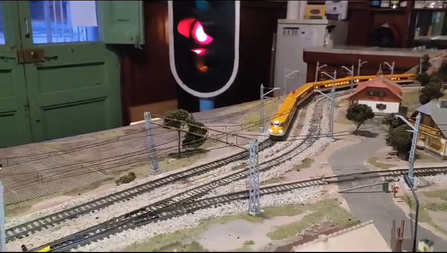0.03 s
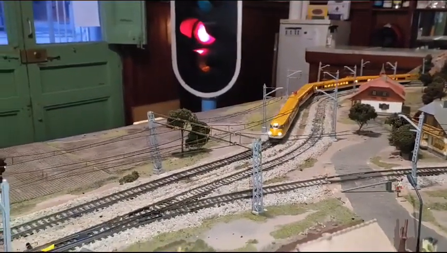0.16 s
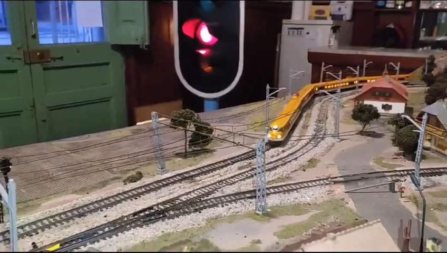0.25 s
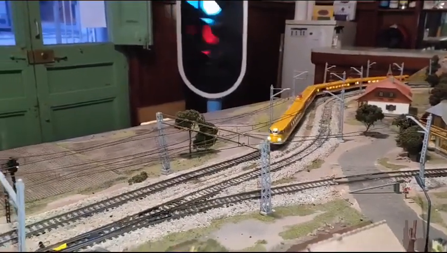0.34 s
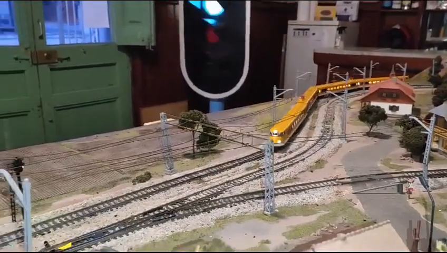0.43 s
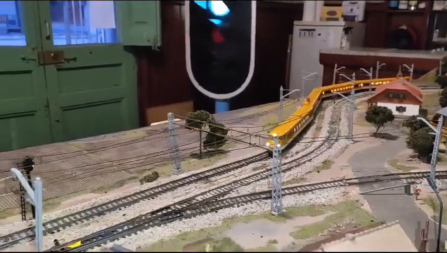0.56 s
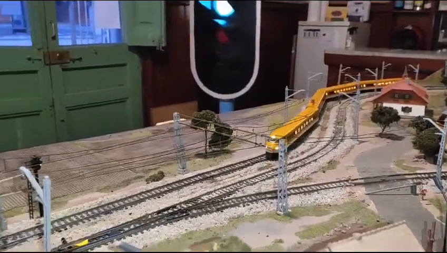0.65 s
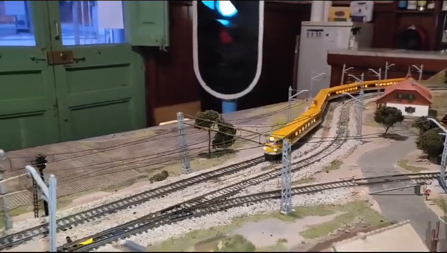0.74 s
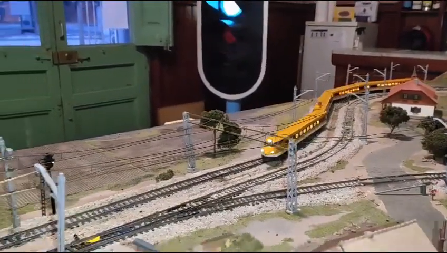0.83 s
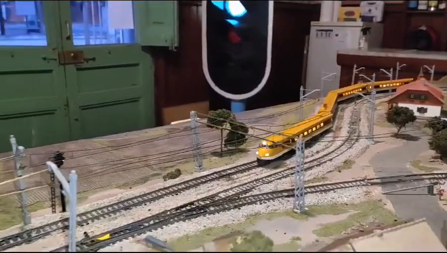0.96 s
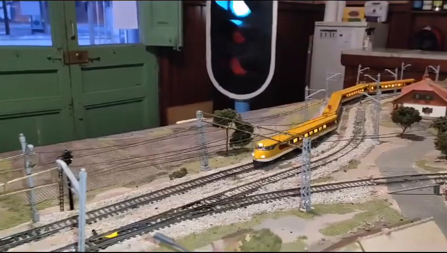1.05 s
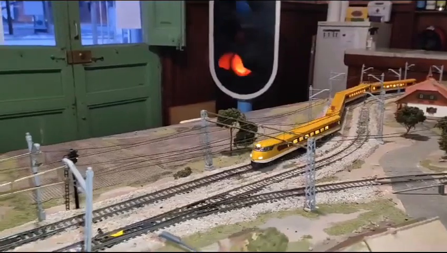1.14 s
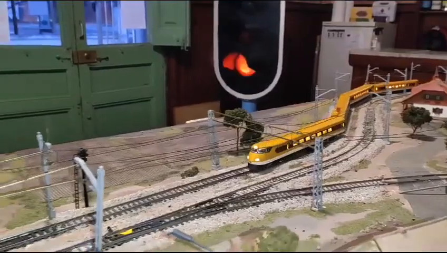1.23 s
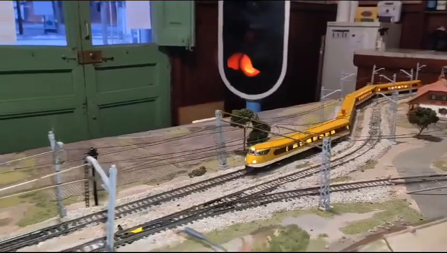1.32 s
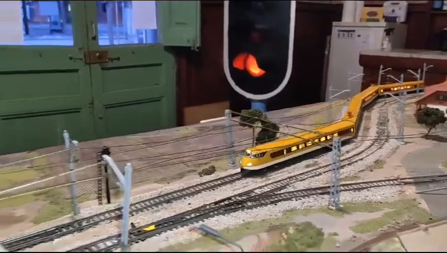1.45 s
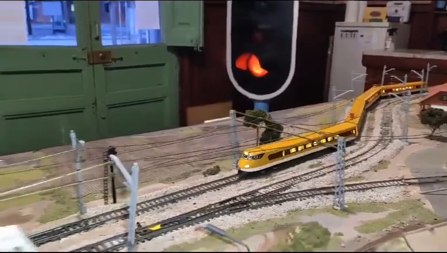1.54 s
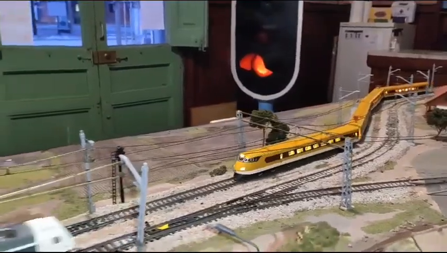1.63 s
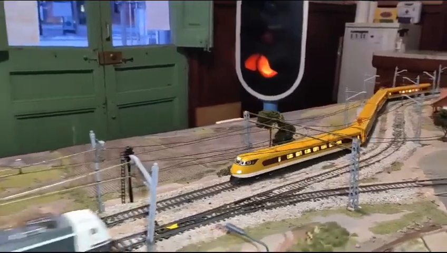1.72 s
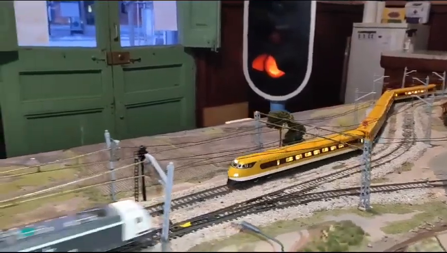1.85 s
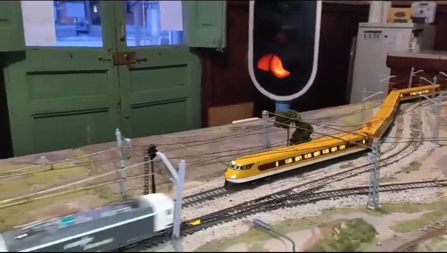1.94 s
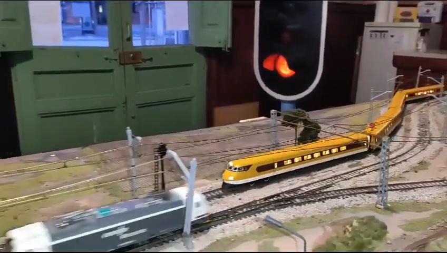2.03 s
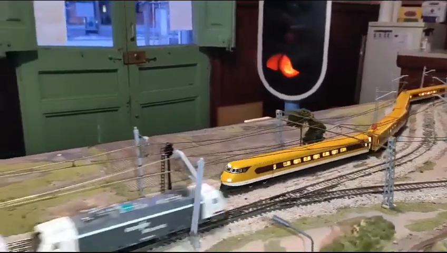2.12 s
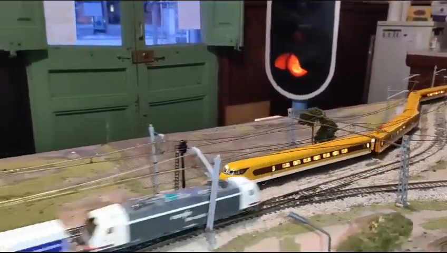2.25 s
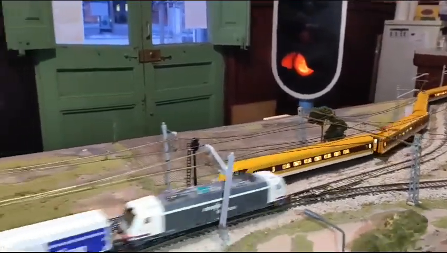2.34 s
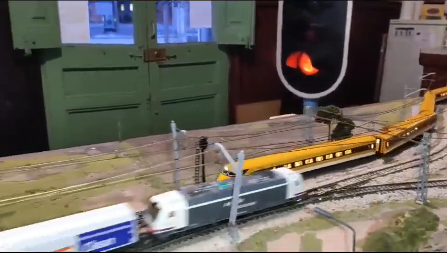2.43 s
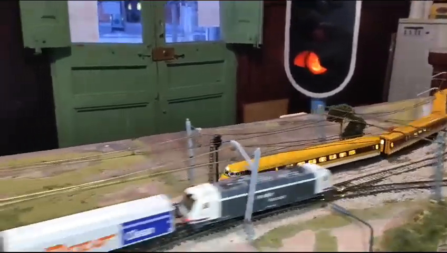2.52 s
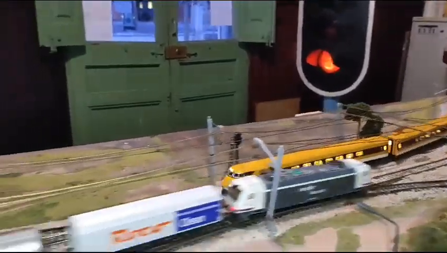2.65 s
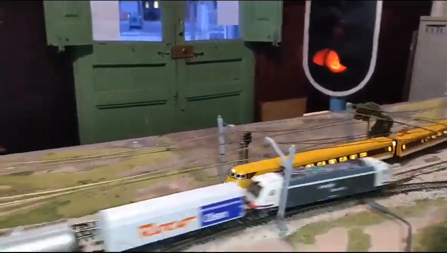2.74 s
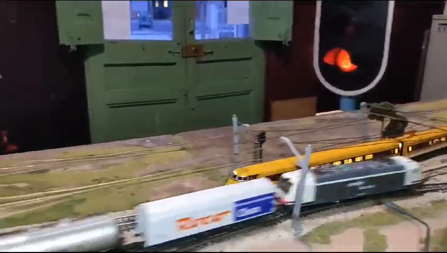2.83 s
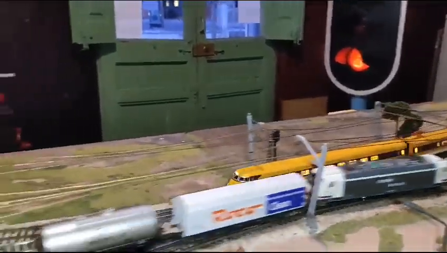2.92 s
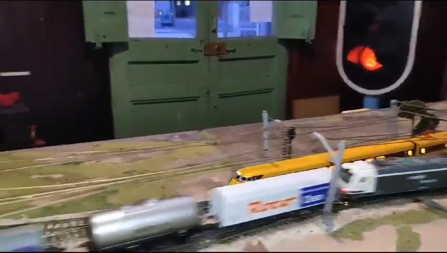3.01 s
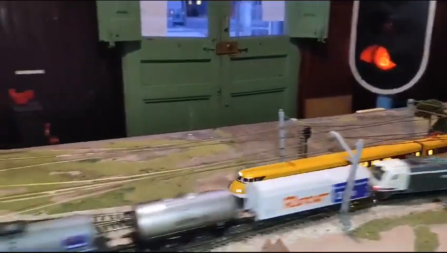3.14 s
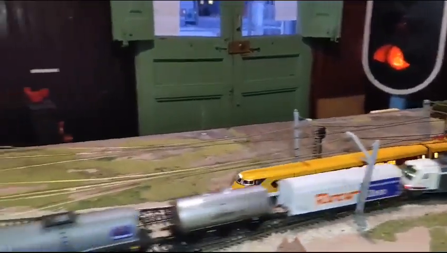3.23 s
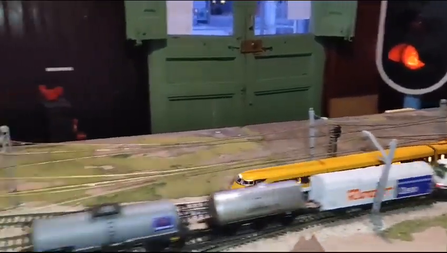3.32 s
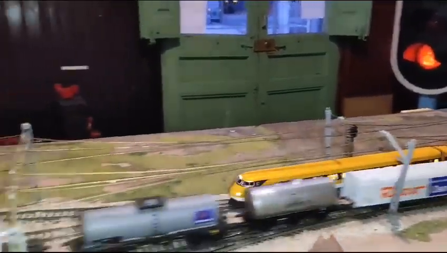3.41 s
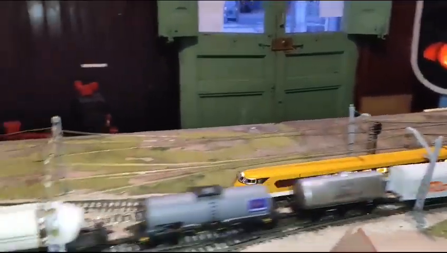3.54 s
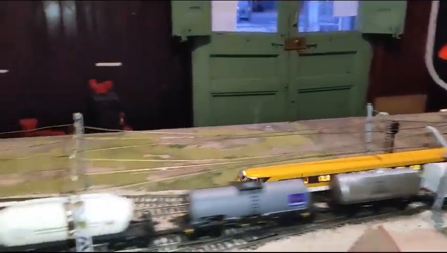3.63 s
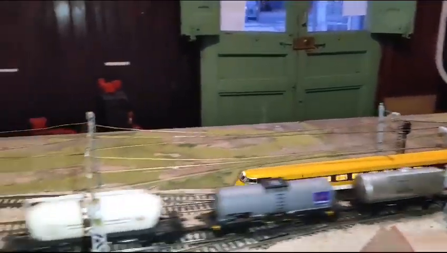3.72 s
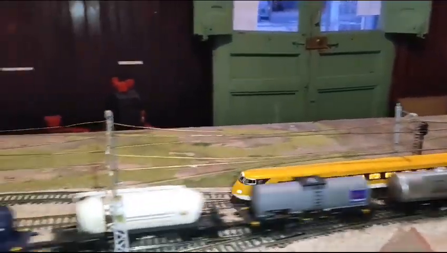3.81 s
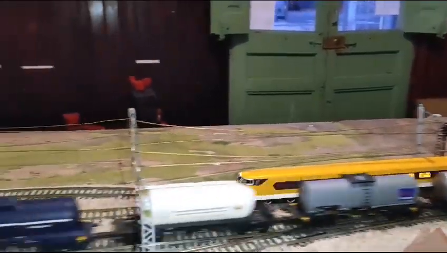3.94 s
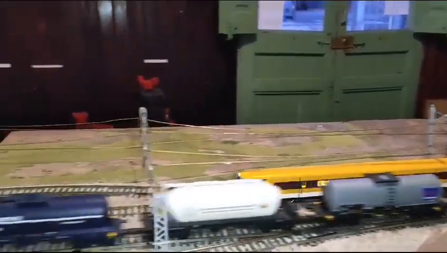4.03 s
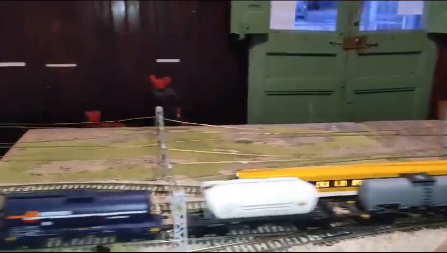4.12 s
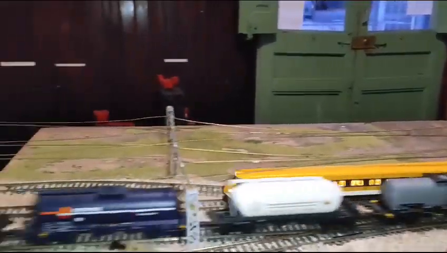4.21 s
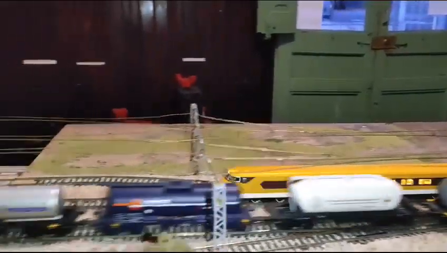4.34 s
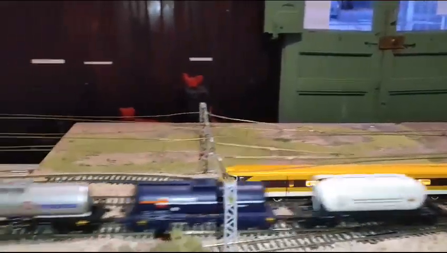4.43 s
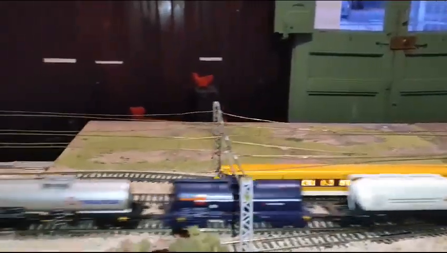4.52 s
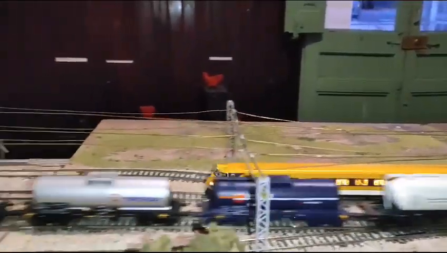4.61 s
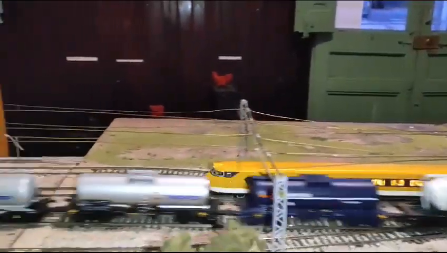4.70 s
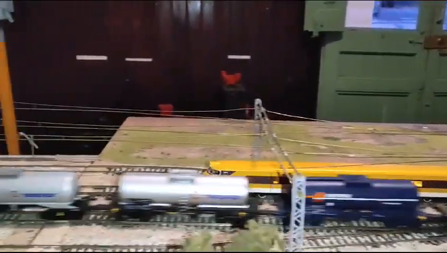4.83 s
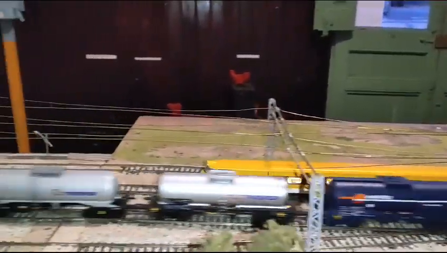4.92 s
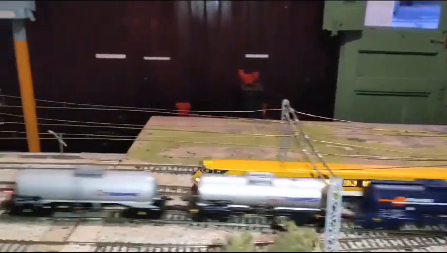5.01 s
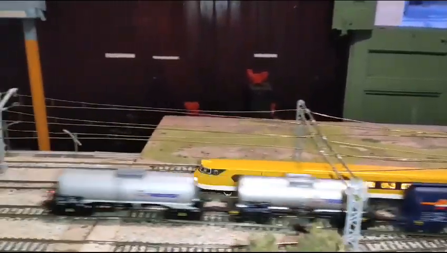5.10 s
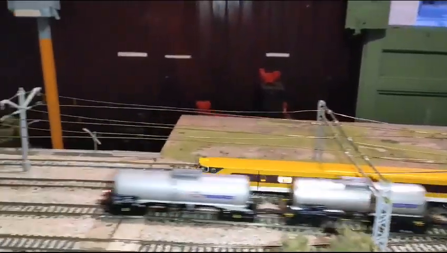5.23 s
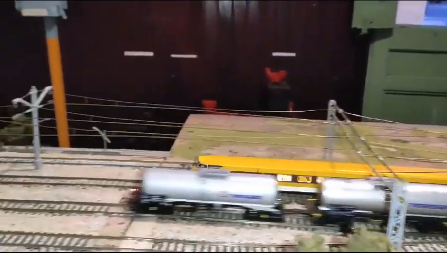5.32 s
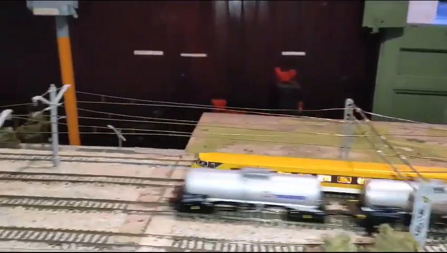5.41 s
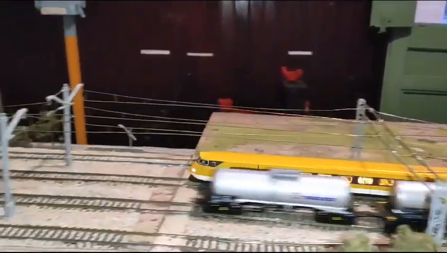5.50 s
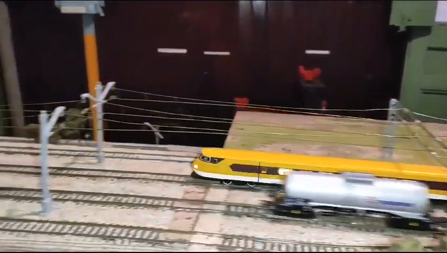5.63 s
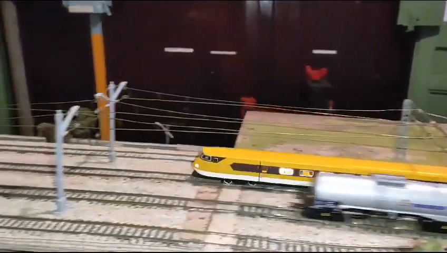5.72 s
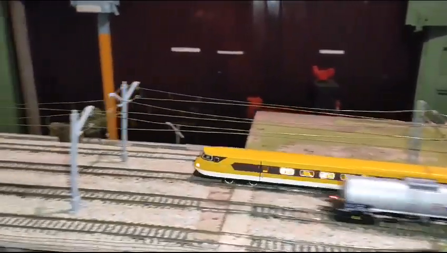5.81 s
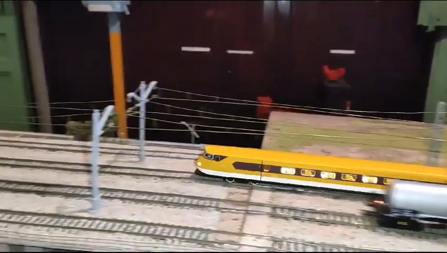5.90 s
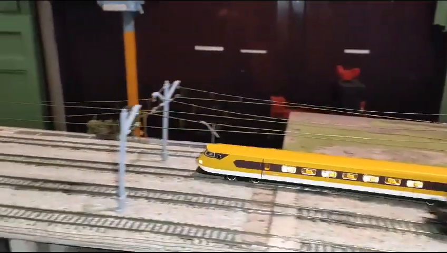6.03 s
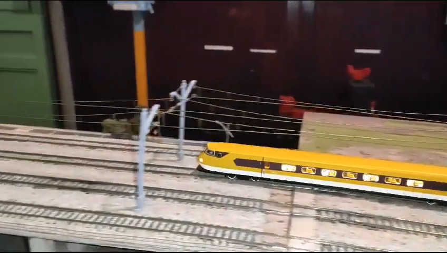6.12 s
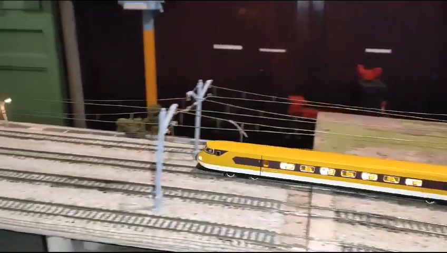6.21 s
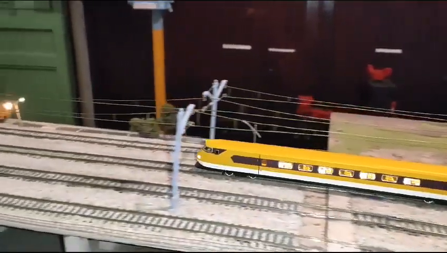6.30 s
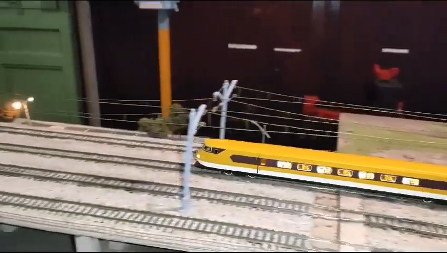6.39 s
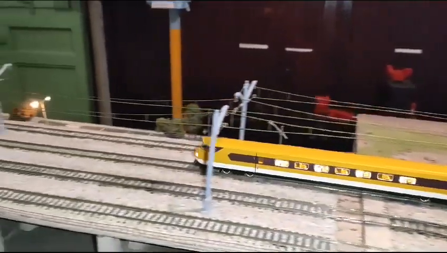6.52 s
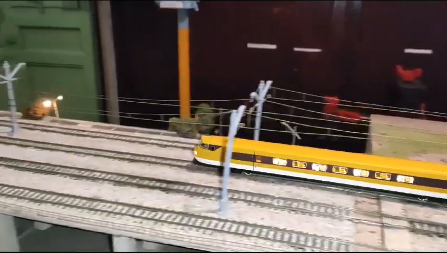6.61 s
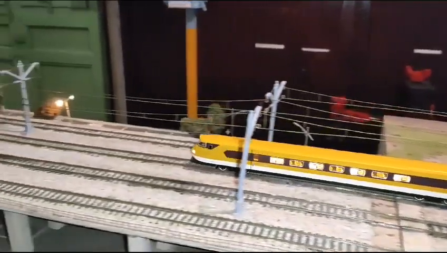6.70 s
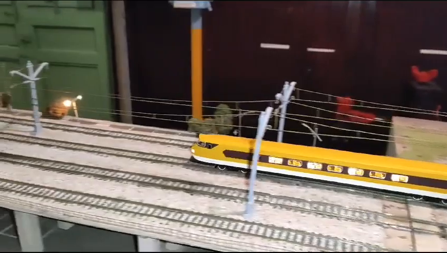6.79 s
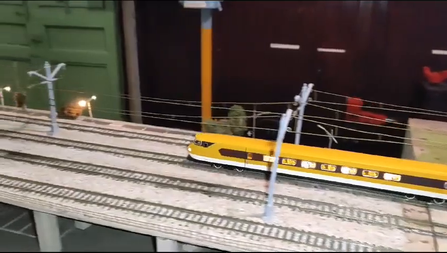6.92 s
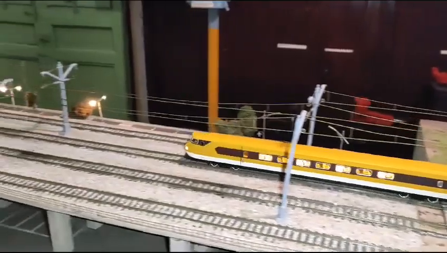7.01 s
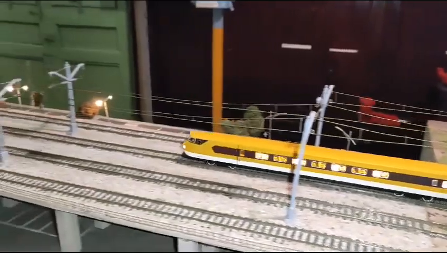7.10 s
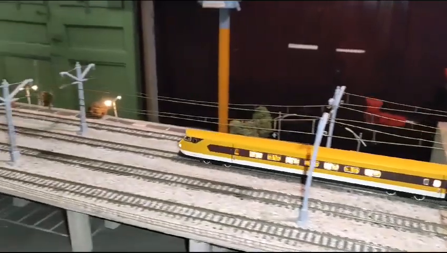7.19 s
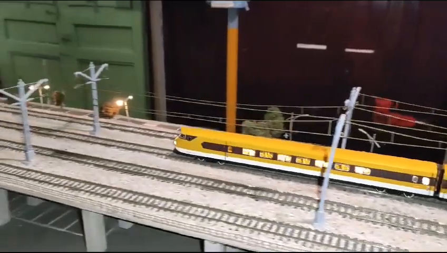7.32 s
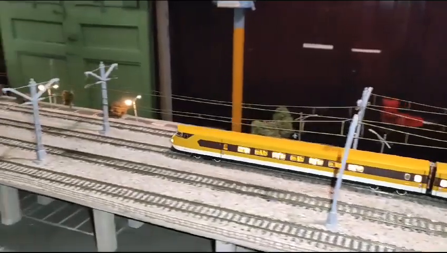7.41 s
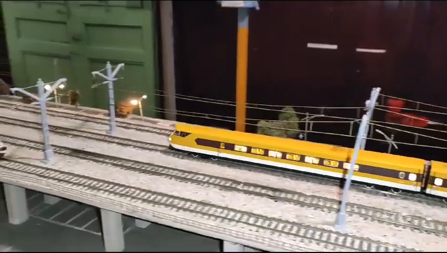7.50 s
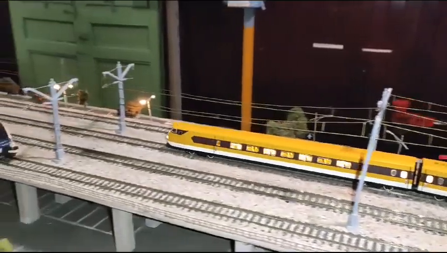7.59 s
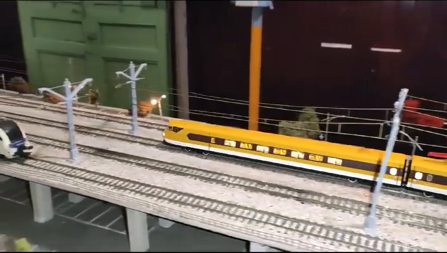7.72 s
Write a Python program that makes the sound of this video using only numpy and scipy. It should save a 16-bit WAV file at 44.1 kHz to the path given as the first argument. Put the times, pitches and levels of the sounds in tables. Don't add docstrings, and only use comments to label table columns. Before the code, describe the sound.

In an indoor hall, a model passenger train approaches with a dry rolling roar and scattered bright clicks over rail joints. A goods train then passes in front, its wheels clattering denser and louder, with faint motor hum and dull baseboard thumps. After it leaves, the roar drops and separate clicks remain. Close phone microphone, short room reflections.

```python
import sys
import numpy as np
from scipy import signal
from scipy.fft import rfft, irfft, next_fast_len
from scipy.io import wavfile
from scipy.ndimage import uniform_filter1d

SR = 44100
rng = np.random.default_rng(int(sys.argv[2]) if len(sys.argv) > 2 else 0)


def store_pcm(level_fs):
    pcm = np.round(np.clip(level_fs, -1, 1) * 32767).astype(np.int16)
    wavfile.write(sys.argv[1], SR, np.atleast_2d(pcm).T)


def gain_from_db(level_db):
    decades = np.asarray(level_db, float) / 20
    return 10 ** decades


N = 341775
USUAL_ROAR_DB = -42


def colour(points, hz):
    f, db = np.transpose(points)
    return gain_from_db(np.interp(np.log(np.maximum(hz, 1)), np.log(f), db))


def unit(x):
    return x / np.sqrt(np.mean(x ** 2))


def walk(rate_hz):
    hold = int(SR / rate_hz)
    levels = rng.standard_normal(size=400)[np.arange(N) // hold % 400]
    return unit(uniform_filter1d(uniform_filter1d(levels, hold), hold))


def mode(hz, centre_hz, width_hz):
    return 1 / (1 + 2j * (hz - centre_hz) / width_hz)


def sung(centre_hz, width_hz):
    size = next_fast_len(N)
    hz = np.arange(size // 2 + 1) * SR / size
    spectrum = rfft(rng.standard_normal(size)) * mode(hz, centre_hz, width_hz) ** 2
    return unit(irfft(spectrum, size)[:N])


def fade(start_s, end_s, fade_s):
    t = np.arange(N) / SR
    return np.clip(np.minimum(t - start_s, end_s - t) / fade_s + .5, 0, 1)


# [dB, scaled in each
PASSAGE = [(0, -45, -5, 5), (.45, -44, -5, 2), (.8, -43.3, -4, 5.5), (1.2, -42, -4, 1.5),
           (1.45, -42.5, -4, 4), (1.8, -41.5, -4.5, 0.5), (2.2, -40.5, -6, 1.5), (2.75, -40.5, -3, -1),
           (3.15, -39.5, -4.5, 0.5), (3.9, -40, -3.5, -1.5), (4.65, -40, -1.5, -1.3), (5.3, -40, -0.5, 3.5),
           (5.95, -40, -2.5, 5), (6.25, -47, -0.5, 2.5), (6.7, -47.5, -1, 1), (6.95, -45.5, -0.5, -1.5),
           (7.3, -47, -1.5, 1.5), (7.75, -45, -0.5, 1)]


def passage():
    start_s, *columns = np.transpose(PASSAGE)
    return [np.interp(np.arange(N) / SR, start_s, column) for column in columns]


# centre_s [s], added_rumble_db [dB]
HOLLOW_SURGES = [(.75, 0), (1.2, 3.5), (1.7, 3), (2.15, -1), (2.55, 1), (2.92, 3.5), (3.5, 3), (3.95, 1),
                 (4.45, 0.5), (5.05, 3.5), (5.4, 2), (5.95, 2), (6.6, 2), (7.2, -2.5), (7.65, 4.5)]


def baseboard_levels(roar_db, tilt_db):
    t, width_s = np.arange(N) / SR, 0.074
    louder_db = roar_db - USUAL_ROAR_DB
    rumble_db = -52 + 0.585 * louder_db + 0.12 * tilt_db
    middle_db = -52.5 + .4 * louder_db + 0.087 * tilt_db
    surge_db = sum(db * np.exp(-((t - at_s) / width_s) ** 2 / 2) for at_s, db in HOLLOW_SURGES)
    return rumble_db + surge_db, middle_db


def grit(rate_hz, spread_db, tail_ms):
    sizes = gain_from_db(spread_db * rng.exponential(size=N).clip(0, 3))
    hits = (rng.random(N) < rate_hz / SR) * sizes
    return signal.lfilter([1], [1, -np.exp(-1000 / (tail_ms * SR))], hits)


# pitch_hz [Hz], density_db [dB per Hz]
ROLLING_COLOUR = [(18, -40), (35, -2.5), (55, -3), (125, -1), (270, -9.5), (450, -9), (900, -3.5),
                  (1150, -4.5), (1700, -1), (2350, -5), (3200, -10.5), (4000, -11), (5100, -13.5),
                  (6400, -19.5)]
BORDERS_HZ = (330, 1150, 3000)


def rolling(roar_db, rumble_db, middle_db, hiss_db, tilt_db):
    size = next_fast_len(N)
    hz = np.arange(size // 2 + 1) * SR / size
    octave = np.log2(np.maximum(hz, 1) / 20)
    parts = np.zeros((4, N))
    knocks, swell = grit(rate_hz=170., spread_db=4.0, tail_ms=1.34), walk(9)
    roughness = gain_from_db(0.77 * (roar_db - USUAL_ROAR_DB))
    for step in range(20):
        centre_hz = 20 * 2 ** (step / 2)
        part = np.searchsorted(BORDERS_HZ, centre_hz)
        mask = np.cos(np.pi * np.clip(octave - step / 2, -.5, .5))
        noise = rfft(rng.standard_normal(size))
        band = irfft(noise * mask * colour(ROLLING_COLOUR, hz), size)[:N]
        treble = np.clip(np.log2(centre_hz / 600) / 3, 0, 1)
        surge_db = 2.2 * (part == 0) * walk(4.6) + 2.5 * (step == 19) * walk(8.2)
        lean_db = (part == 2) * (step - 13) * 0.38 * tilt_db
        flicker_db = 0.79 * walk(20) + 0.21 * treble * swell + surge_db + lean_db
        parts[part] += band * gain_from_db(flicker_db) * (1 + 0.52 * treble * knocks * roughness)
    levels_db = (rumble_db - 1.5, middle_db, roar_db - 0.6, hiss_db)
    return sum(unit(part) * gain_from_db(db) for part, db in zip(parts, levels_db))


# start_s [s], wheel_db [dB], wheel_pitch_hz [Hz], flange_db [dB]
PASSENGER_WHEELS = [(0.0865, -29, 3680, -34.5), (0.3734, -36.5, 4100, -50), (0.4384, -29, 3810, -43),
                    (0.7174, -33, 3980, -40), (0.7218, -19.5, 3440, -33.5), (0.7366, -25, 3480, -42),
                    (0.8587, -26, 3900, -38), (0.8714, -31, 3630, -40), (1.002, -32.5, 4400, -45.5),
                    (1.1192, -28.5, 3890, -38), (1.1433, -28, 3840, -45), (1.2533, -30, 3370, -39),
                    (1.5853, -28, 3540, -46), (1.6574, -35, 4500, -39), (1.7293, -33, 3940, -41),
                    (1.9777, -31.5, 3950, -35.5), (6.3944, -31.5, 3780, -37), (6.4526, -31.5, 3680, -45),
                    (6.4988, -27.5, 3920, -38), (6.5302, -22.5, 5900, -30), (6.6383, -31, 4187, -45),
                    (6.7885, -32, 3980, -37), (6.8208, -18.5, 3700, -36), (6.9272, -33, 4460, -41),
                    (6.9595, -19, 3870, -33.5), (7.2414, -34, 4310, -34.5), (7.278, -33, 4740, -39),
                    (7.3449, -20.5, 3870, -38), (7.3854, -28.5, 4110, -34), (7.673, -24.5, 4410, -43)]
GOODS_FRONT_WHEELS = [(2.0765, -27.5, 4200, -35.5), (2.162, -30.5, 4050, -39), (2.1834, -24, 3500, -39),
                      (2.4106, -28, 4030, -46.5), (2.5643, -26, 3630, -40), (2.583, -24.5, 3510, -38),
                      (2.721, -19.5, 3500, -31.5), (2.8934, -31, 3960, -38), (2.9318, -32.5, 3920, -37.5),
                      (2.987, -27, 3510, -34), (3.186, -28.5, 4860, -34), (3.2515, -18.5, 4430, -29),
                      (3.2974, -25, 4330, -36.5), (3.307, -30, 4480, -36.5), (3.386, -23, 4600, -29),
                      (3.4297, -22, 4800, -32.5), (3.5414, -30.5, 4570, -39), (3.6532, -23.5, 3860, -35),
                      (3.7482, -25.5, 3650, -31), (3.7859, -22.5, 3580, -39), (3.8661, -31.5, 4850, -43),
                      (3.8804, -28, 4550, -34), (3.909, -21, 4210, -32.5), (3.9358, -28, 3510, -38),
                      (4.0509, -27, 3750, -24.5), (4.078, -28, 4430, -46), (4.152, -30, 3750, -40),
                      (4.1866, -24, 3610, -35.5), (4.193, -27.5, 4320, -35), (4.3206, -24, 4050, -37)]
GOODS_REAR_WHEELS = [(4.4493, -28, 4460, -39), (4.4837, -14.5, 4960, -26.5), (4.527, -27, 4100, -37),
                     (4.5968, -30.5, 4700, -34), (4.6281, -15.5, 4850, -26.5), (4.6506, -19.5, 4160, -27.5),
                     (4.6716, -22, 4780, -35.5), (4.7406, -27, 4020, -35), (4.7695, -16.5, 4730, -26.5),
                     (4.794, -22, 4420, -29), (4.815, -21, 4300, -37), (4.9384, -20.5, 4200, -28),
                     (4.9691, -25, 4610, -36), (5.053, -30, 4460, -37), (5.1168, -22.5, 4770, -36),
                     (5.188, -23, 4900, -26.5), (5.2854, -20.5, 4330, -29), (5.3904, -25, 4320, -37),
                     (5.5673, -23.5, 4200, -36), (5.6293, -24, 4010, -33.5), (5.678, -26, 4080, -39),
                     (5.6955, -25, 5050, -38), (5.7292, -26, 4270, -32.5), (5.746, -26, 4840, -37),
                     (5.775, -27, 4850, -37), (5.8726, -23.5, 4170, -40), (5.8854, -27, 4650, -38),
                     (5.9414, -26.5, 4630, -31), (6.168, -34, 4500, -45), (6.2048, -30.5, 4200, -40)]
# start_s [s], level_db [dB]
EARLY_GRAZES = [(0.4437, -25.5), (0.852, -36), (1.1504, -31), (1.1578, -24), (1.2366, -33), (1.3014, -31),
                (1.311, -34), (1.3157, -30), (1.4473, -25), (1.6891, -37), (1.6891, -29), (1.7892, -25),
                (2.1256, -30), (2.227, -26.5), (2.4304, -29.5), (2.5331, -29), (2.5474, -30),
                (2.8384, -31), (2.8689, -33), (3.0275, -27), (3.3745, -30), (3.4424, -33), (3.476, -27.5),
                (3.6471, -27), (3.741, -27), (3.9489, -22.5), (4.0123, -33)]
LATER_GRAZES = [(4.291, -29), (4.39, -21.5), (4.4527, -27), (4.494, -24), (4.6905, -25), (4.7811, -25),
                (4.801, -33), (4.8874, -27), (4.9534, -32), (5.167, -27), (5.6184, -30), (5.879, -32),
                (5.9344, -30), (6.0591, -35), (6.1943, -35), (6.9007, -33), (7.0376, -35), (7.4589, -34),
                (7.5752, -35), (7.657, -37), (7.7059, -41.5)]
# start_s [s], level_db [dB]
BOARD_KNOCKS = [(0.7226, -32), (1.1044, -29), (1.1217, -26), (1.2376, -24), (1.5488, -28), (1.586, -30),
                (1.6165, -26), (2.0624, -22.5), (2.3835, -24), (2.4125, -26), (2.5111, -24), (2.5661, -26),
                (2.7182, -25), (2.8253, -31), (2.8958, -22.5), (3.2515, -31), (3.5003, -30), (3.9352, -22),
                (4.2867, -22), (4.3206, -35), (4.6549, -26), (5.4213, -24), (5.5469, -27), (5.6311, -24),
                (5.679, -35), (5.7299, -24), (5.9356, -25), (6.8205, -37), (6.958, -28), (7.2434, -29)]


def axle_contacts(wheels, drop_ms, ms_per_db, board_db):
    return [(s, db - 4, hz, flange_db + 5, db + board_db, drop_ms + ms_per_db * (db + 27.5))
            for s, db, hz, flange_db in wheels]


def contacts():
    wheel_hz = 4450
    axles = axle_contacts(PASSENGER_WHEELS, drop_ms=1.7, ms_per_db=0.03, board_db=-12)
    for wheels in (GOODS_FRONT_WHEELS, GOODS_REAR_WHEELS):
        axles += axle_contacts(wheels, drop_ms=2.1, ms_per_db=-.065, board_db=-18)
    grazes = [(s, db - 18, wheel_hz, db - 1.5, db - 19, 2.4)
              for table in (EARLY_GRAZES, LATER_GRAZES) for s, db in table]
    knocks = [(s, db - 21, wheel_hz, db - 21.5, db - 6, 3.4) for s, db in BOARD_KNOCKS]
    rows = np.array(axles + grazes + knocks)
    rows[:, 5] *= np.exp(.2 * rng.standard_normal(len(rows)))
    return rows.T[:, :, None]


def ring(chatter, response):
    size = chatter.shape[1]
    sound = irfft(rfft(chatter) * response, size)
    return sound / np.abs(sound).max(axis=1, keepdims=True)


def joints():
    start_s, wheel_db, wheel_hz, flange_db, board_db, length_ms = contacts()
    size = 1024
    t, hz = np.arange(size) / SR, np.arange(size // 2 + 1) * SR / size
    age = t / (0.42 * np.clip(length_ms, .5, 8) / 1000)
    envelope = age * np.exp(-age) + 0.34 * (1 - np.exp(-age)) * np.exp(-age / 4)
    chatter = rng.standard_normal((len(start_s), size)) * envelope
    from_peak = np.abs(age - 1)
    chatter = chatter + 1.6 * (from_peak == from_peak.min(axis=1, keepdims=True))
    flange_hz = 9608 + 90 * np.clip(flange_db - wheel_db, 0, 14)
    wheel_mode = mode(hz, wheel_hz, 2160) ** 2 - 0.31 * mode(hz, 7200, 1200)
    wheel_mode = wheel_mode + 0.35 * mode(hz, np.maximum(0.85 * wheel_hz, 3300), 1800)
    flange_mode = mode(hz, flange_hz, 3740) ** 2 + 0.63 * mode(hz, 12000, 2300)
    board_mode = mode(hz, 1850, 1110) ** 2
    clicks = gain_from_db(wheel_db + 4.5) * ring(chatter, wheel_mode)
    clicks += gain_from_db(flange_db + 3.0) * ring(chatter, flange_mode)
    clicks += gain_from_db(board_db + 4.0) * ring(chatter, board_mode)
    out = np.zeros(N + size)
    np.add.at(out, (start_s * SR).astype(int) + np.arange(size), clicks)
    return out[:N]


# pitch_hz [Hz], width_hz [Hz], level_db [dB against the roar]
WAGON_SHELLS = [
    (1000, 130, -20),
    (1520, 160, -14),
    (1690, 140, -11.5),
    (1960, 170, -16),
    (2380, 170, -18),
]


def bodies(roar_db, tilt_db):
    out = np.zeros(N)
    for pitch_hz, width_hz, db in WAGON_SHELLS:
        lean_db = 4 * tilt_db * np.log2(min(pitch_hz, 2600) / 1800)
        out += gain_from_db(roar_db + db + lean_db + 3.2 * walk(22)) * sung(pitch_hz, width_hz)
    return out


# pitch_hz [Hz], width_hz [Hz], level_db [dB], start_s [s], end_s [s]
MOTOR_HUM = [
    (236, 18, -62.5, 0, 4.2),
    (288.6, 5.5, -68, .3, 3.2),
    (159, 20, -58, 2.4, 6.1),
    (99, 14.5, -63, 1, 8.5),
    (803, 52, -59.5, 6.45, 6.75),
    (700, 90, -55, 2.75, 2.77),
]


def motors():
    return sum(gain_from_db(db) * sung(pitch_hz, width_hz) * fade(start_s, end_s, .3)
               for pitch_hz, width_hz, db, start_s, end_s in MOTOR_HUM)


# shaft_multiple [-], level_db [dB], start_s [s], end_s [s]
ARMATURE_TONES = [
    (1, -58, 2.3, 4.6),
    (1, -65, 0, 2.3),
    (2, -69, -.5, 4.2),
]


def armature():
    shaft_hz = 117.5 * (1 + .022 * walk(6))
    turns = np.cumsum(shaft_hz) / SR
    out = np.zeros(N)
    for multiple, db, start_s, end_s in ARMATURE_TONES:
        tone = np.sin(2 * np.pi * multiple * turns)
        out += gain_from_db(db + 3.5 + 3.7 * walk(12)) * tone * fade(start_s, end_s, 0.28)
    return out


def hall(x):
    t60_s, gap_s = 0.2, 0.0031
    t = np.arange(int(.3 * SR)) / SR
    tail = rng.standard_normal(len(t)) * gain_from_db(-60 * t / t60_s) * (t > gap_s)
    return signal.fftconvolve(x, tail / np.sqrt(np.sum(tail ** 2)))[:N]


def scene():
    roar_db, close_db, tilt_db = passage()
    rumble_db, middle_db = baseboard_levels(roar_db, tilt_db)
    clicks = joints()
    bed = rolling(roar_db, rumble_db, middle_db, roar_db + close_db, tilt_db)
    engines = motors() + armature()
    mix = bed + clicks + bodies(roar_db, tilt_db) + engines + gain_from_db(-14.5) * hall(clicks)
    return mix[None]


def top_cut(x):
    return signal.sosfilt(signal.butter(12, 15710, fs=SR, output="sos"), x)


# pitch_hz [Hz], gain_db [dB]
MICROPHONE_PORT = [(6500, 0), (8200, 0.5), (9750, 4.5), (11000, -6), (12600, -21.5), (13400, -24),
                   (14400, -20.5), (15500, -30), (15850, -70)]


def record(dry):
    size = next_fast_len(N)
    port = colour(MICROPHONE_PORT, np.arange(size // 2 + 1) * SR / size)
    x = irfft(rfft(dry, size) * port, size)[:, :N]
    hz, _, cells = signal.stft(x, SR, nperseg=1024)
    patch = uniform_filter1d(np.abs(cells), size=11, axis=1)
    usual = uniform_filter1d(patch, size=15, axis=2)
    cells = cells * ((patch > gain_from_db(-1.2) * usual) | (hz[:, None] < 12000))
    mix = signal.istft(cells, SR, nperseg=1024)[1][:, :N]
    return top_cut(mix)


dry = scene()
out = record(dry)
store_pcm(out)
```